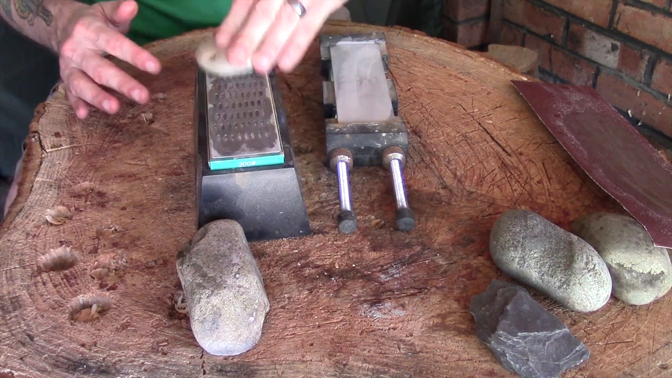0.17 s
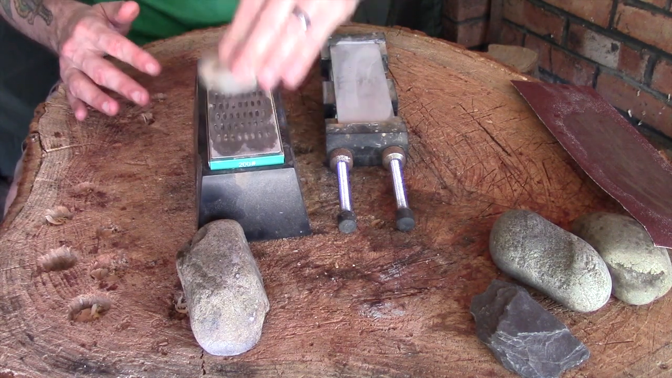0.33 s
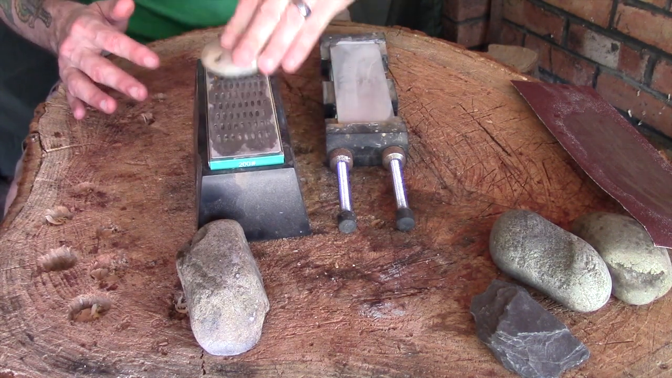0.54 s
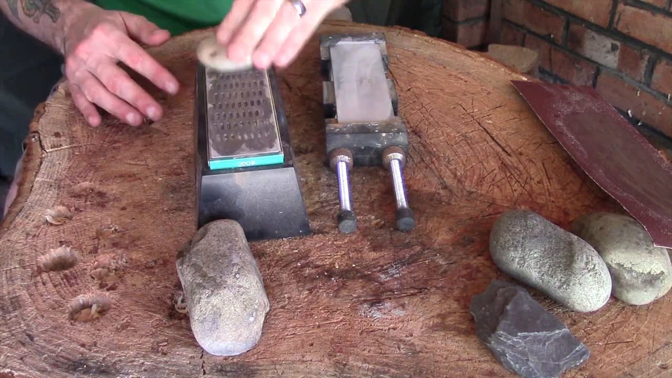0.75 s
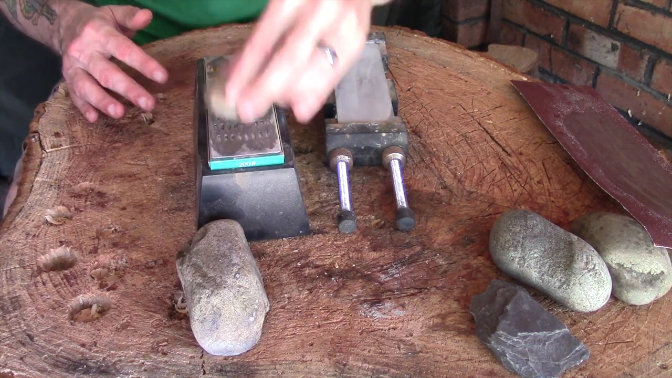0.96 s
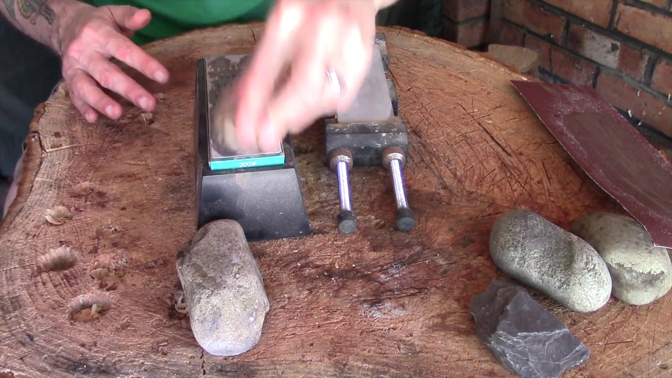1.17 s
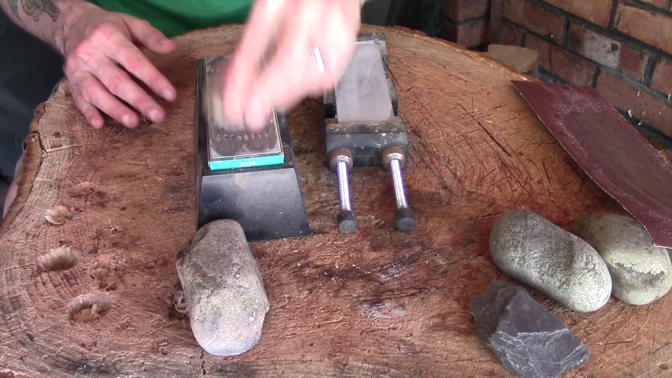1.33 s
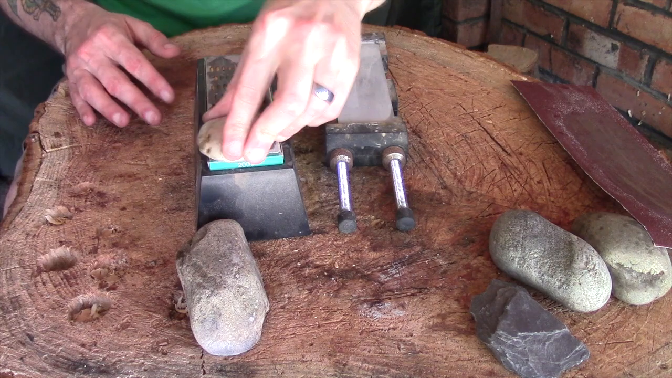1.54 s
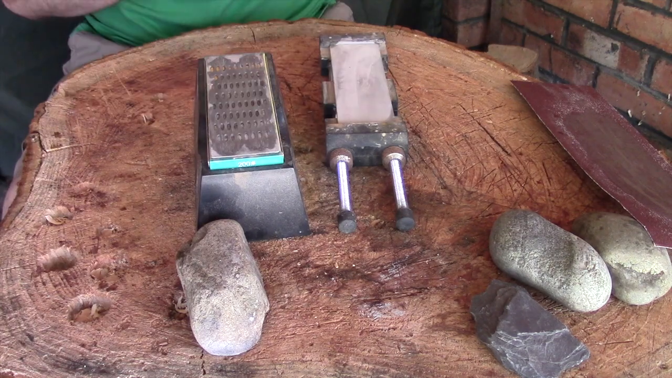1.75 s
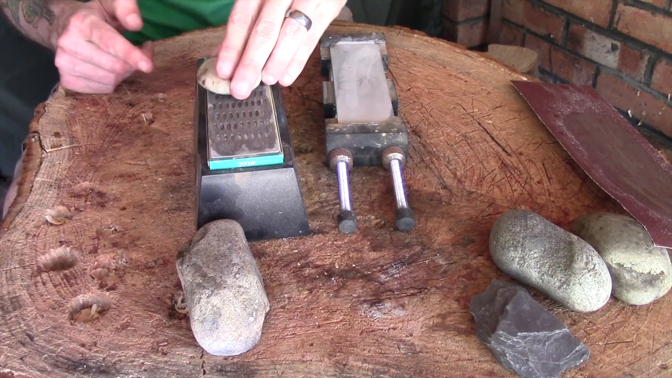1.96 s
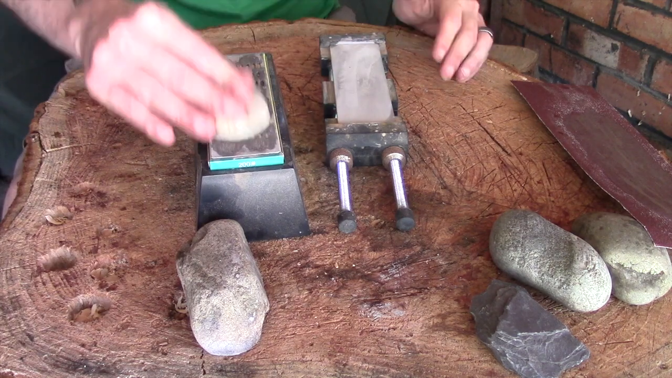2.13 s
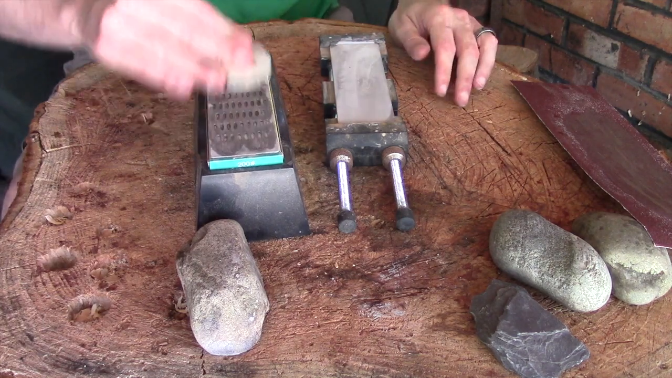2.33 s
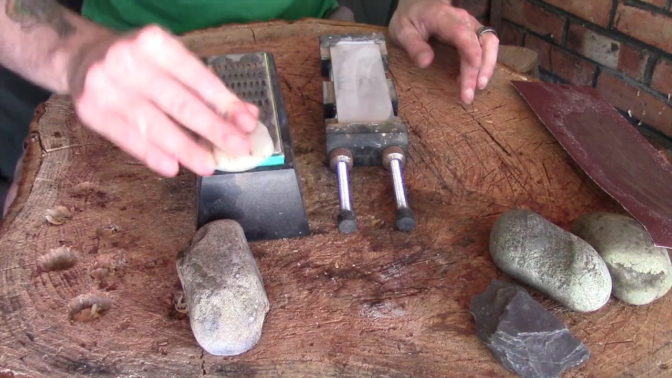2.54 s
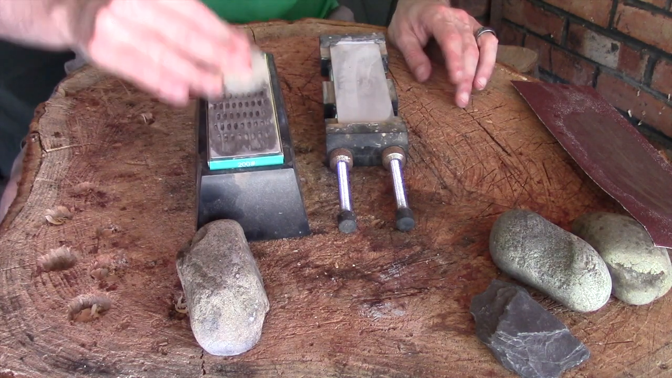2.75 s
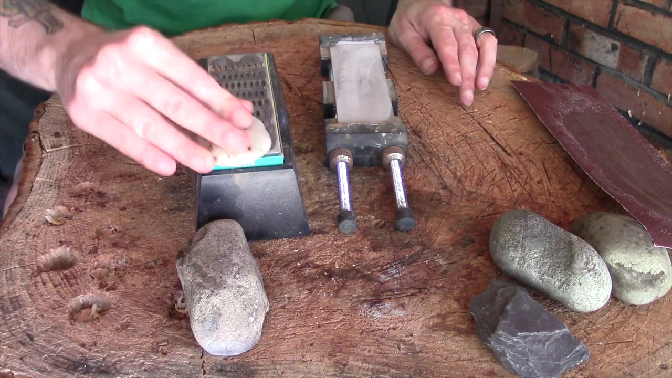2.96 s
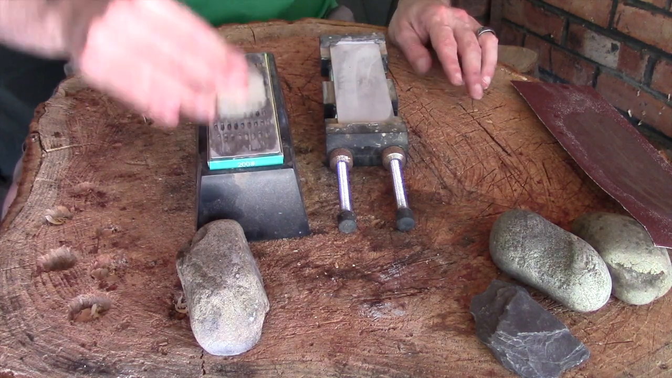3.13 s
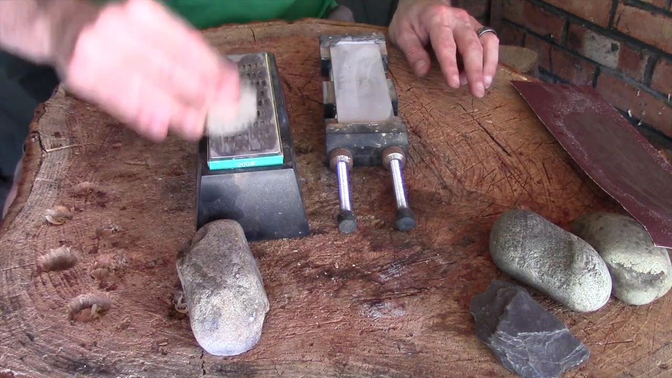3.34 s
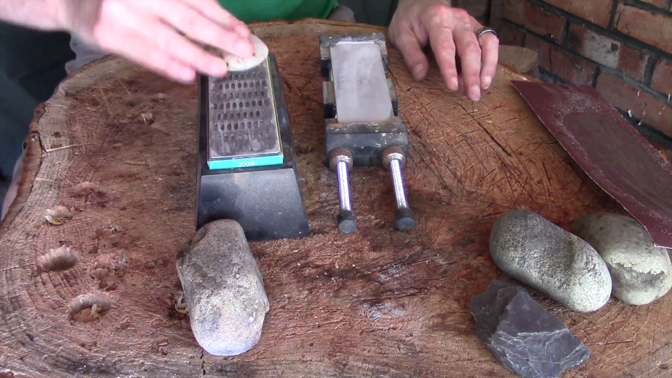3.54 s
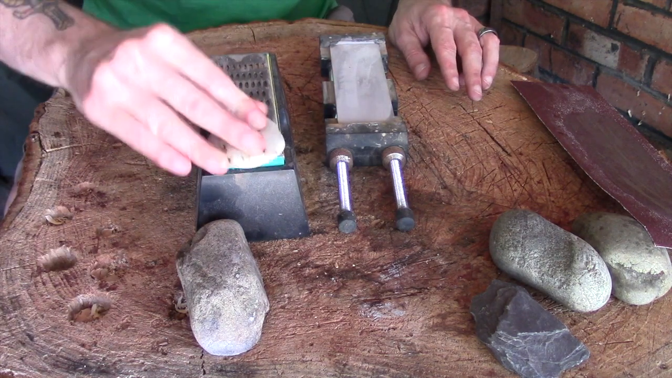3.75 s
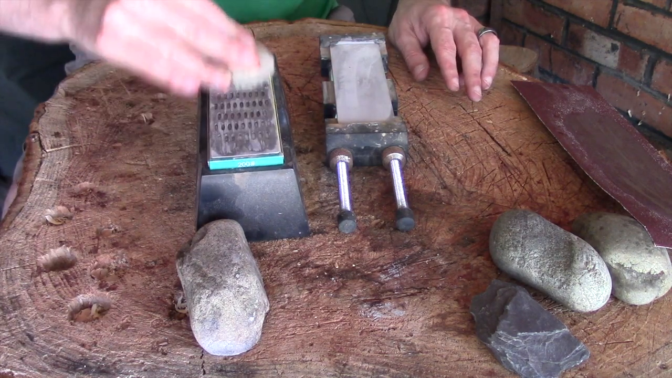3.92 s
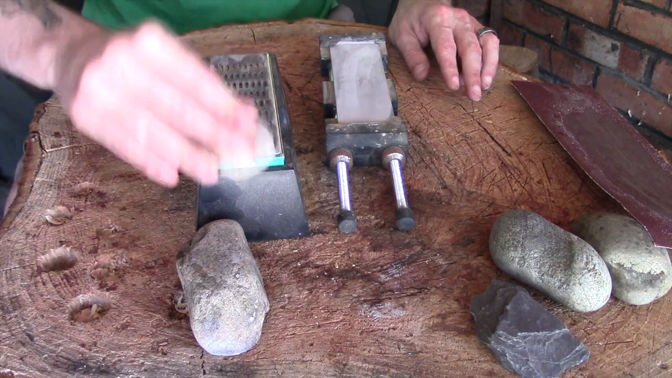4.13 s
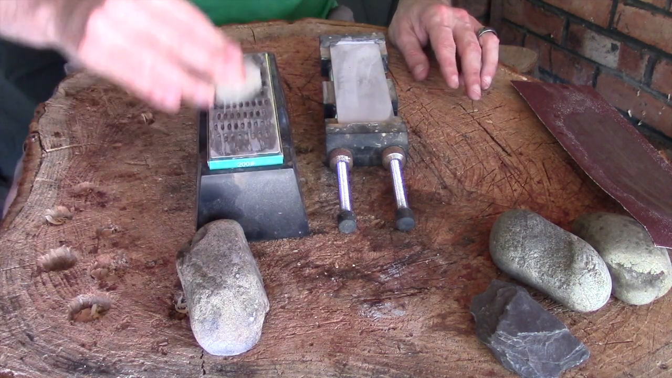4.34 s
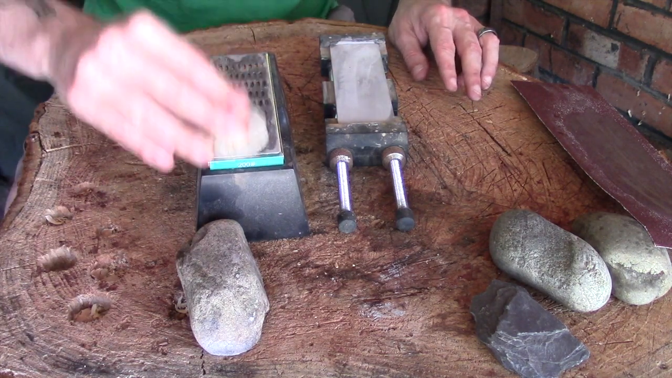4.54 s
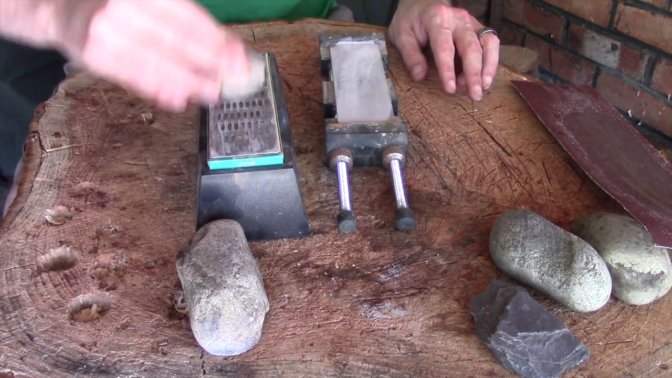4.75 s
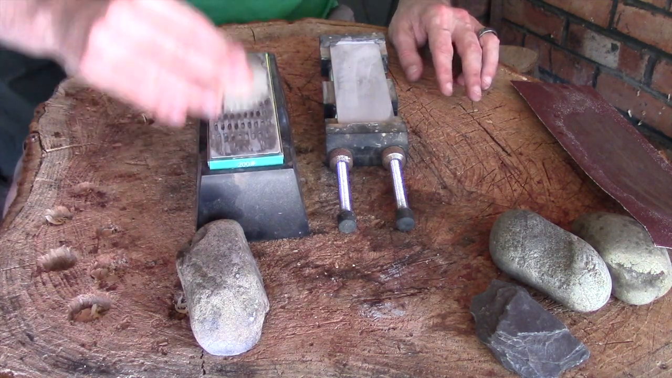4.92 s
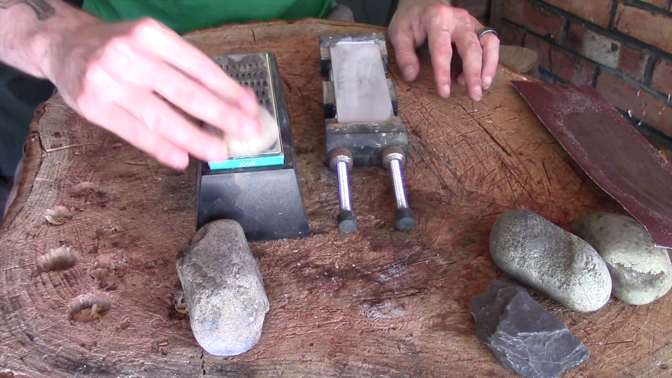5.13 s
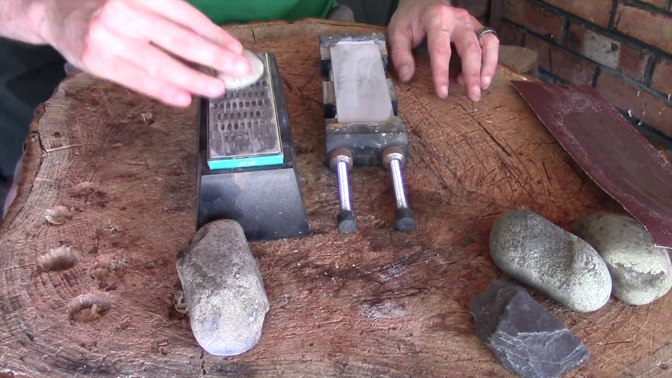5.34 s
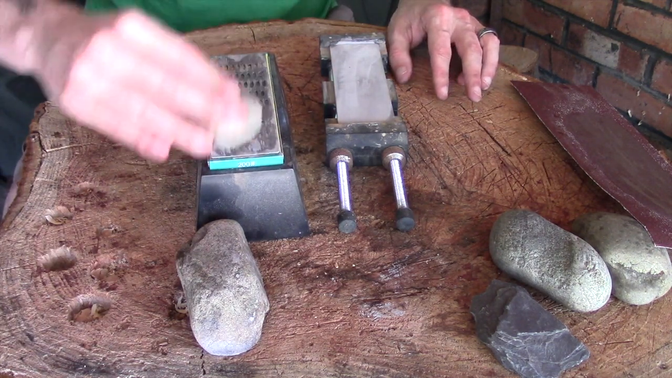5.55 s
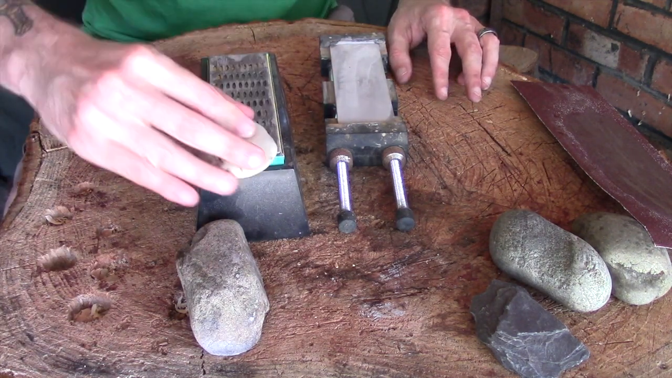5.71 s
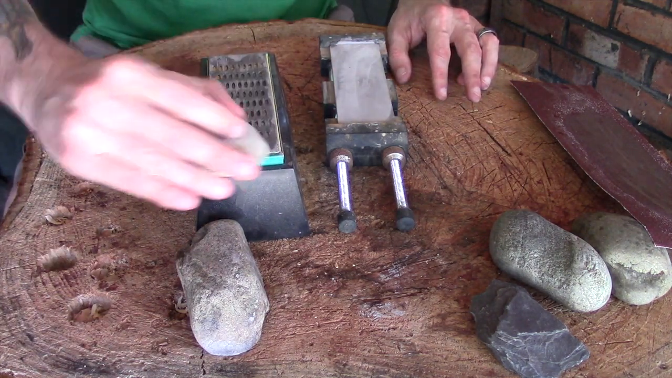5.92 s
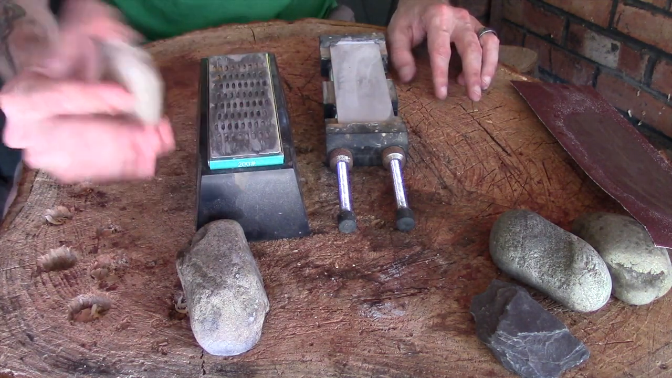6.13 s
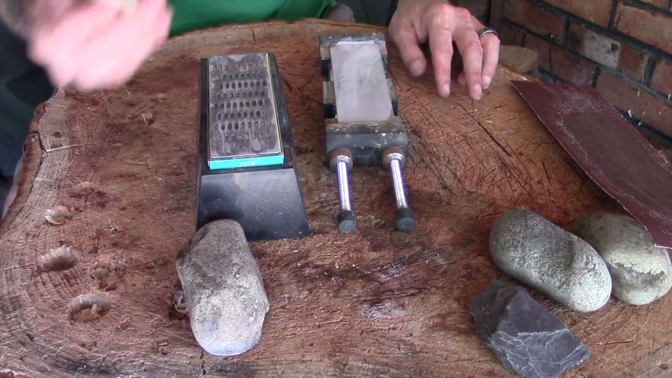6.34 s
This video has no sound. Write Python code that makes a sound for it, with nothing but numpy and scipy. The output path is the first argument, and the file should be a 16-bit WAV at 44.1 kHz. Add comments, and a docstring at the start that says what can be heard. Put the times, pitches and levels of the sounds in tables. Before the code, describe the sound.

Very rapid, sped-up scraping of a stone on a gritty plate drops to normal-paced grinding strokes with a hollow knock.

```python
"""Lapping a pebble in a yard

A pebble is rubbed to and fro on a diamond plate that sits on a hollow plastic block on a log. The grit
hisses and rasps, friction and knocks ring the block, and traffic and a machine hum far behind.
First a time-lapse at eight times the pace: strokes blur to a buzz, the block rings three octaves up and
the hiss spreads over the whole range. Then normal pace: nine strokes, a knock, and the pebble lifts off."""
import sys
import numpy as np
from scipy import signal
from scipy.fft import rfft, irfft, next_fast_len
from scipy.io import wavfile
from scipy.ndimage import uniform_filter1d, map_coordinates

SR = 44100
rng = np.random.default_rng(int(sys.argv[2]) if len(sys.argv) > 2 else 0)


def unload_wav(signal):
    """Save mono or channel-first audio to the path in sys.argv[1] as 16-bit WAV at rate SR, clipped to [-1, 1]."""
    wavfile.write(
        sys.argv[1],
        SR,
        np.round(np.clip(np.atleast_2d(signal).T, -1, 1) * 32767).astype(np.int16),
    )


N = 281355
TIME = np.arange(N) / SR
FFT_SIZE = next_fast_len(N + 8192)  # room for ringing tails
FAST_PACE, NORMAL_PACE, NORMAL_FROM_S = 8, 1, 3.615
FAST_STROKE_COUNT, LAST_TURN_S = 127, 5.756  # the last stroke fades before it reaches its turn

# Distant traffic bed: (frequency [Hz], relative level [dB])
TRAFFIC_SPECTRUM = [(8.8, -75.5), (15, -42), (118, -18), (172, -13.5), (193, -16.5), (317, -17),
                    (388, -16.5), (803, -19), (876, -31), (956, -19.5), (1040, -24.5), (4460, -35.5),
                    (15500, -56)]
# Tones of a far machine: (frequency [Hz], relative level [dB])
MACHINE_TONES = [(315, -57), (338, -66.5), (677, -71.5)]
# In-phase side signal that leans the image left: (frequency [Hz], relative level [dB])
LEFT_LEAN = [(100, -17), (400, -20), (800, -24), (1100, -33), (2000, -44), (15000, -40)]
# Side signal a quarter cycle off the mid: (frequency [Hz], level against mid [dB])
STEREO_SPREAD = [(100, -18), (500, -30.5), (1300, -56), (3000, -81), (8000, -21.5), (15000, -67)]
# Hollow block: (frequency [Hz], bandwidth [Hz], level [dB], far-end boost [dB], boost at both ends [dB])
BLOCK_MODES = [(281, 67, -12.5, -1.5, 1.5), (295.8, 29, -12, -1, 0), (380, 28.5, -10, -1.5, 2.5),
               (409, 29.6, 1.5, -1.5, 1), (501.4, 34, -6.5, -0.5, 4), (578.5, 32, -7.5, 0, 4),
               (670, 61, -7.5, 1.5, 5.5), (823, 48.3, -0.5, 0, 5.5), (961, 81, -5.5, -1, 5),
               (1074, 31, -3, 0.5, 4), (1140, 26, 0.5, -0.5, 2), (1340, 108, -8, 0.5, 3.5),
               (1464, 48, -4, -1, 5), (1630, 560, -12, -1.5, 5)]
# The pebble hits and chatters: (time [s], relative push [dB], hardness [Hz], relative crack [dB])
PEBBLE_KNOCKS = [(2.0248, -7.5, 687, -7), (2.027, -10, 704, -26), (2.343, -14.5, 600, -36),
                 (2.618, -12.5, 800, -36), (2.706, -10.5, 800, -36), (4.2055, -4, 750, -17),
                 (4.2111, -8, 700, -20.5), (4.2145, -4.5, 593, -22.5), (4.222, -15, 604, -27),
                 (4.2299, -18.5, 594, -30), (4.2338, -24, 810, -26.5), (5.7672, -17, 850, -31)]
# Grit cutting the pebble: (frequency [Hz], relative level [dB])
RASP_SPECTRUM = [(880, -37.5), (1500, -26.5), (2060, -13.5), (2810, -2), (3230, -5.5), (4070, -5),
                 (5010, -8), (6000, -9.5), (7800, -11.5), (13200, -120)]
# Sheen of the fine grit: (frequency [Hz], relative level [dB])
HISS_SPECTRUM = [(2650, -36.5), (4500, -15), (5310, -8), (6440, -1.5), (7960, -1), (9350, 2.5),
                 (12100, -2.5), (13300, -7.5), (15500, -10)]
# Nearly white hiss of the time-lapse: (frequency [Hz], relative level [dB])
FAST_HISS_SPECTRUM = [(25, 0.5), (300, 1), (2000, 0.5), (6000, 0), (16000, 4.5)]
# Hand rhythm in the time-lapse: (time [s], strokes done [count])
FAST_TEMPO = [(0.012, 0), (0.29, 10), (0.557, 20), (0.823, 30), (1.098, 40), (1.364, 50), (1.645, 60),
              (1.694, 62), (2.05, 63), (2.11, 65), (2.147, 67), (2.183, 68), (2.226, 70), (2.458, 80),
              (2.681, 90), (2.911, 100), (3.157, 110), (3.42, 120), (3.579, 126)]
# Time-lapse runs, one per hand: (start [s], end [s], relative hiss [dB], relative block drive [dB])
FAST_RUNS = [(0, 1.68, -29.5, -26), (2.026, 3.612, -30.5, -26)]
# Normal-pace strokes, away and back in turn, in relative levels:
# (start [s], hiss [dB], rasp [dB], block drive [dB], opening accent [dB])
SLOW_STROKES = [(3.614, -8, -17, -18, 1.5), (3.774, -8, -19, -21, 0), (3.992, -8.5, -18, -16.5, 1),
                (4.199, -10, -20.5, -19.5, 2.5), (4.424, -9.5, -18, -16.5, 0), (4.628, -9, -19.5, -19, 1),
                (4.856, -9.5, -17, -17.5, 1), (5.093, -14.5, -21.5, -22, 1), (5.421, -12, -18, -16.5, 2.5)]
# Swell of a stroke away: (position [share of stroke], hiss [dB], rasp [dB], block drive [dB])
AWAY_SHAPE = [(0.14, -3, -1.5, -9.5), (0.47, -0.5, 0.5, 0.5), (0.77, -8, 1, -5)]
# Swell of a stroke back: (position [share of stroke], hiss [dB], rasp [dB], block drive [dB])
BACK_SHAPE = [(0.15, -6.5, 3.5, -3.5), (0.45, 0.5, 1, 0), (0.77, -5, 2.5, -4)]
# Fade of the last stroke, a row each for hiss, rasp and block drive: (start [s], fade rate [dB/s])
LAST_FADE = [(5.61, 206), (5.642, 258), (5.69, 198)]
# The lifting pebble grazes the plate, in relative levels:
# (peak time [s], 20 dB rise [s], 20 dB fall [s], hiss [dB], rasp [dB], block drive [dB])
LIFT_SCUFFS = [(5.772, 0.008, 0.06, -64, -40, -24), (5.858, 0.04, 0.036, -46, -32.5, -26)]


def amp(db):
    """Decibels to gain."""
    return np.exp(np.asarray(db) * (np.log(10) / 20))


def unit(x):
    """Scale to rms 1."""
    return x / np.sqrt(np.mean(x ** 2) + 1e-20)


def db_at(spectrum, hz):
    """Read an EQ curve along a log frequency axis."""
    points_hz, levels_db = np.transpose(spectrum)
    return np.interp(np.log(hz + 1), np.log(points_hz + 1), levels_db)


def wobble(rate):
    """Smooth random modulation with `rate` knots a second."""
    knots = rng.standard_normal(int(N * rate / SR) + 4)
    return map_coordinates(knots, [TIME[::8] * rate]).repeat(8)[:N]


def filtered(x, response):
    """Apply a complex frequency response."""
    hz = np.fft.rfftfreq(FFT_SIZE, 1 / SR)
    return irfft(rfft(x, FFT_SIZE) * response(hz), FFT_SIZE)[..., :N]


def coloured(x, spectrum):
    """Apply an EQ curve and scale to rms 1."""
    return unit(filtered(x, lambda hz: amp(db_at(spectrum, hz))))


def widen(mid, pace, lean_db):
    """Close stereo pair: the bass leans left, and a weak side part sits a quarter cycle off."""
    side = filtered(mid, lambda hz: amp(lean_db + db_at(LEFT_LEAN, hz / pace))
                    + 1j * amp(db_at(STEREO_SPREAD, hz / pace)))
    return np.array([mid + side, mid - side])


def yard(pace, traffic_db, white_db, hum_db):
    """Background bed: distant traffic and a machine's wavering hum, pitched up with the pace."""
    noise = rng.standard_normal((2, N))
    mid, side = filtered(noise, lambda hz: amp(db_at(TRAFFIC_SPECTRUM, hz / pace)) + amp(white_db))
    hum = sum(amp(db + hum_db + 1.42 * wobble(9 * pace)) * np.sin(2 * np.pi * hz * pace * TIME)
              for hz, db in MACHINE_TONES)
    traffic = amp([[0.4], [-0.4]]) * (mid + amp(-12) * side * [[1], [-1]])
    return amp(traffic_db + 0.6 * wobble(5 * pace)) * unit(traffic) + hum


def log_thud(start_s=4.206, hz=157, db=-18.5, t60_s=0.2, attack_s=0.0035):
    """The heaviest knock reaches the log and rings one low mode."""
    t = np.clip(TIME - start_s, 0, None)
    return amp(db - 60 * t / t60_s) * np.sin(2 * np.pi * hz * t) * (1 - np.exp(-t / attack_s))


def knocks(pace, crack_t60_s=0.023):
    """Each hit is a rounded push into the block, duller for a soft contact, and a crack in the air."""
    blows, cracks = np.zeros((2, N))
    t = np.arange(1600 // pace) / SR * pace
    for start_s, push_db, hardness_hz, crack_db in PEBBLE_KNOCKS:
        if (start_s < NORMAL_FROM_S) == (pace > NORMAL_PACE):  # only the hits played at this pace
            onset = round(start_s * SR)
            contact = 2 * np.pi * hardness_hz * t
            blows[onset:][:len(t)] += amp(push_db + 21) * (contact * np.exp(1 - contact)) ** 2
            cracks[onset:][:len(t)] += amp(crack_db - 60 * t / crack_t60_s) * rng.standard_normal(len(t))
    crack_band = signal.butter(2, [1500, 7000], "bandpass", fs=SR, output="sos")
    return blows, signal.sosfilt(crack_band, cracks)


def block_ring(friction, blows, pace):
    """Friction and blows ring the block; each mode has its sweet spot and drifts with the grip."""
    place = np.pi * strokes_done()
    far, ends = np.cos(place), np.cos(2 * place)
    hz = np.fft.rfftfreq(FFT_SIZE, 1 / SR)
    spectrum = 0
    for k, (mode_hz, width_hz, db, far_db, ends_db) in enumerate(BLOCK_MODES):
        drive = friction * amp(far_db * far + ends_db * ends + wobble(9 * pace)) + blows
        damping = 1j * hz * width_hz * pace
        resonance = damping / ((mode_hz * pace) ** 2 - hz ** 2 + damping)
        spectrum += rfft(drive, FFT_SIZE) * (-1) ** k * amp(db) * resonance
    low_cut_hz = 210 * pace  # the small block radiates little below its first mode
    radiation = -hz ** 2 / (low_cut_hz ** 2 - hz ** 2 + 1.4j * hz * low_cut_hz)
    return irfft(spectrum * radiation, FFT_SIZE)[:N]


def grit(grain_db, patchy_db):
    """Dense micro-fractures: noise with uneven grain sizes and drifting patches of colour."""
    grains = rng.standard_normal(N) * amp(grain_db * wobble(900))
    frames = signal.stft(grains, nperseg=256)[2]
    patches = uniform_filter1d(rng.standard_normal(frames.shape), size=4, axis=0)
    patches = uniform_filter1d(patches, size=7, axis=1)
    return signal.istft(frames * amp(patchy_db * unit(patches)), nperseg=256)[1][:N]


def strokes_done():
    """The hand's travel: strokes counted from the start, fractions included."""
    fast_times, fast_counts = np.transpose(FAST_TEMPO)
    turns = [row[0] for row in SLOW_STROKES] + [LAST_TURN_S]
    counts = FAST_STROKE_COUNT + np.arange(len(turns))
    return np.interp(TIME, [*fast_times, *turns], [*fast_counts, *counts], right=counts[-1] + 0.5)


def reversal(bite, ease):
    """1 where the hand turns, 0 in mid stroke; bite and ease are the shares spent starting and stopping."""
    position = strokes_done() % 1
    starting = np.clip(1 - position / bite, 0, 1)
    stopping = np.clip(1 - (1 - position) / ease, 0, 1)
    return np.maximum(starting, stopping * (TIME < SLOW_STROKES[-1][0]))  # no turn after the last stroke


def fast_envelopes(stall_s=2.148, slow_down_s=0.04, pick_up_s=0.0089):
    """Hiss and drive gains: the first run dies as the pebble lifts;
    the second stalls once, then breaks off as normal pace begins."""
    stall = np.interp(TIME, [stall_s - slow_down_s, stall_s, stall_s + pick_up_s], [0, 1, 0])
    fade_db_per_s, stall_db = np.array([[2400], [2000]]), np.array([[22], [11]])
    gains = 0
    for start_s, end_s, *levels_db in FAST_RUNS:
        db = np.c_[levels_db] - fade_db_per_s * np.clip(TIME - end_s, 0, None) - stall_db * stall
        gains += amp(db) * (TIME >= start_s) * (TIME < NORMAL_FROM_S)
    return gains


def fast_lapping():
    """Time-lapse buzz: the hiss ducks deeply at each reversal, the block's drive less."""
    hiss_gain, drive = fast_envelopes()
    turn = reversal(bite=0.27, ease=0.26)
    hiss_gain = hiss_gain * amp(-12 * turn + 1.67 * wobble(60))
    hiss = hiss_gain * coloured(grit(2.4, 0.52), FAST_HISS_SPECTRUM)
    side = hiss_gain * amp(-24.5) * coloured(grit(1.2, 0.68), FAST_HISS_SPECTRUM)
    friction = drive * amp(11.5 - 9.5 * turn + 1.6 * wobble(150)) * grit(2.3, 1.0)
    blows, cracks = knocks(FAST_PACE)
    body = widen(block_ring(friction, blows, FAST_PACE) + cracks, FAST_PACE, lean_db=-34.5)
    return body + hiss * amp([[0.4], [-0.4]]) + side * [[1], [-1]]


def slow_envelopes():
    """Hiss, rasp and drive gains: strokes swell by direction, the last fades, the lifting pebble scuffs."""
    done = np.clip(strokes_done() - FAST_STROKE_COUNT, 0, None)
    stroke, position = np.minimum(done.astype(int), len(SLOW_STROKES) - 1), done % 1
    _, *levels_db, accent_db = np.transpose(SLOW_STROKES)[:, stroke]
    away, back = ([np.interp(position, shares, layer) for layer in layers]
                  for shares, *layers in (np.transpose(AWAY_SHAPE), np.transpose(BACK_SHAPE)))
    accent = accent_db * np.clip(1 - 2 * position, 0, 1)
    fade = [db_per_s * np.clip(TIME - start_s, 0, None) for start_s, db_per_s in LAST_FADE]
    db = levels_db + np.where(stroke % 2, back, away) + accent - fade
    gains = amp(db) * (TIME >= SLOW_STROKES[0][0])
    for peak_s, rise_s, fall_s, *peaks_db in LIFT_SCUFFS:
        from_peak = np.abs(TIME - peak_s) / np.where(TIME < peak_s, rise_s, fall_s)
        gains += amp(np.c_[peaks_db] - 20 * from_peak ** 1.7)
    return gains


def slow_lapping():
    """Normal pace: hiss, rasp and block ring share the pebble's judder and duck at each reversal."""
    hiss_gain, rasp_gain, drive = slow_envelopes()
    turn, judder = reversal(bite=0.091, ease=0.22), wobble(45)
    hiss_gain = hiss_gain * amp(-25.7 * turn + 0.4 * judder + 1.15 * wobble(130))
    hiss = hiss_gain * coloured(grit(0.91, 2.55), HISS_SPECTRUM)
    rasp_gain = rasp_gain * amp(-19 * turn + 0.61 * judder + 1.34 * wobble(90))
    rasp = rasp_gain * coloured(grit(0.96, 1.52), RASP_SPECTRUM)
    friction = drive * amp(18 - 13.7 * turn + 0.89 * judder + 0.78 * wobble(30)) * grit(2.1, 1.7)
    blows, cracks = knocks(NORMAL_PACE)
    body = block_ring(friction, blows, NORMAL_PACE) + log_thud()
    return widen(hiss + rasp + body + cracks, NORMAL_PACE, lean_db=2)


def scene():
    """Lapping up front, over a yard that runs at the same pace."""
    fast_yard = yard(FAST_PACE, traffic_db=-51, white_db=-41, hum_db=4)
    slow_yard = yard(NORMAL_PACE, traffic_db=-47.5, white_db=-57, hum_db=4.5)
    return np.where(TIME < NORMAL_FROM_S, fast_yard, slow_yard) + fast_lapping() + slow_lapping()


def record(dry):
    """Soft-clip the loudest peaks, then cut the very top with a steep low-pass."""
    ceiling, stop_hz, slope_hz = 1.02, 15820, 160
    clipped = dry / (1 + np.abs(dry / ceiling) ** 8) ** (1 / 8)
    return filtered(clipped, lambda hz: np.clip((stop_hz - hz) / slope_hz, 0, 1) ** 2)


dry = scene()
out = record(dry)
unload_wav(out)
```